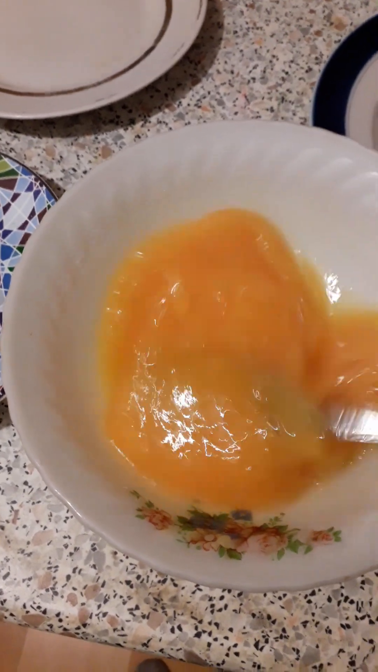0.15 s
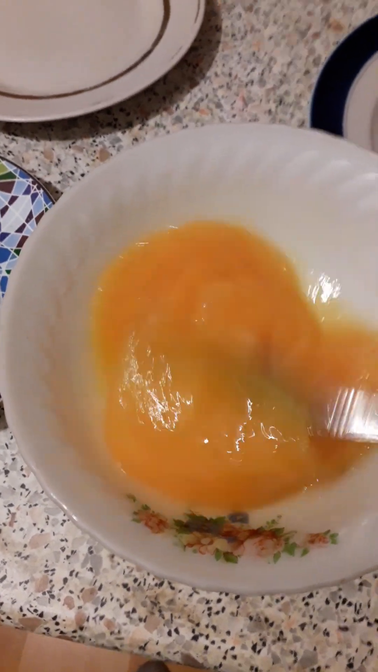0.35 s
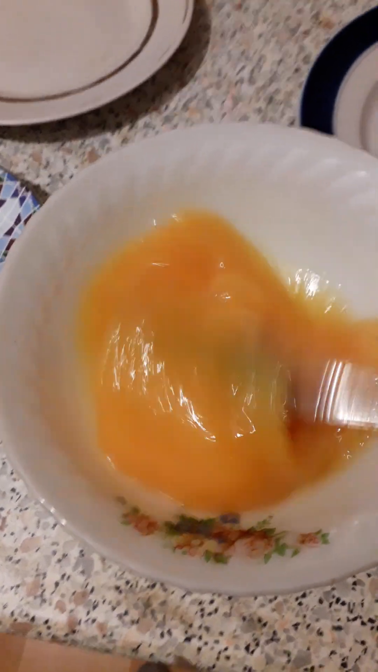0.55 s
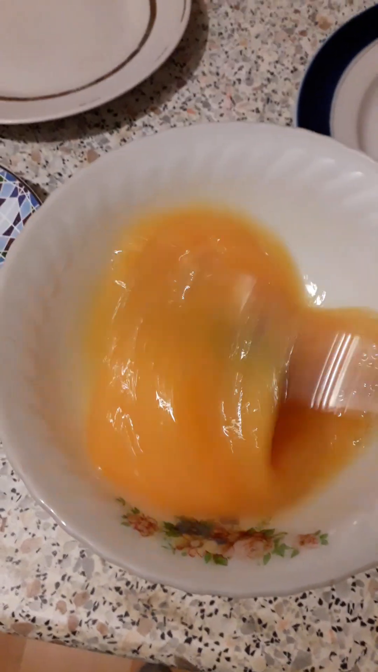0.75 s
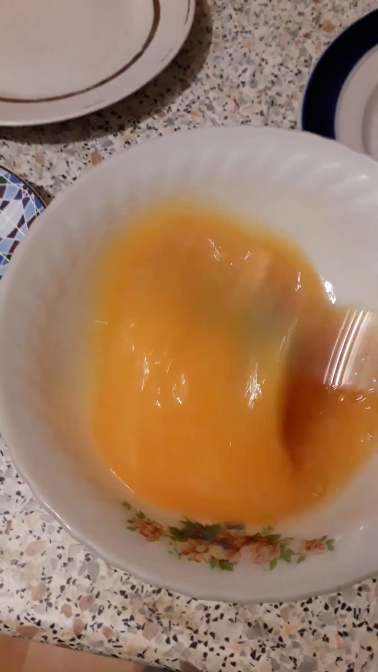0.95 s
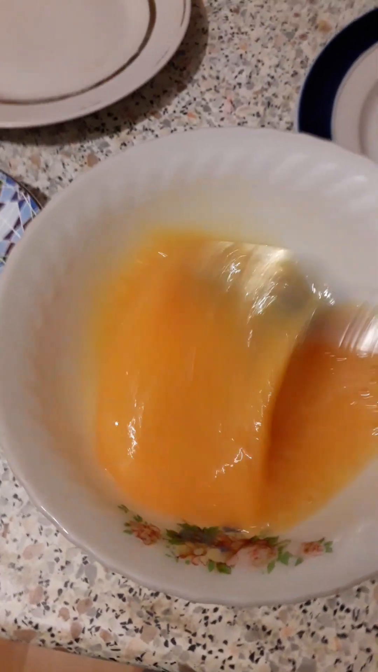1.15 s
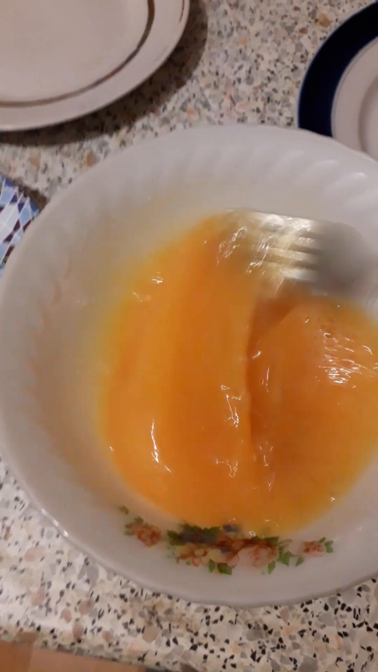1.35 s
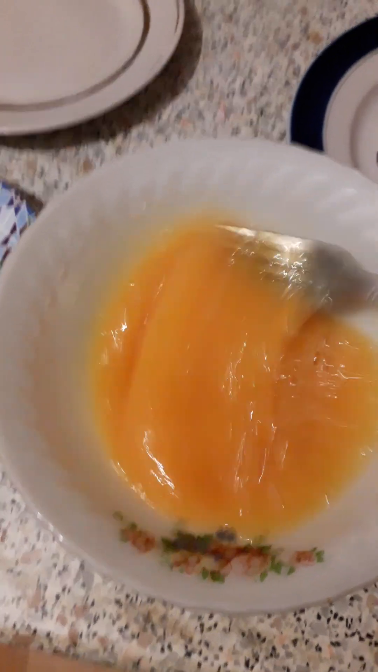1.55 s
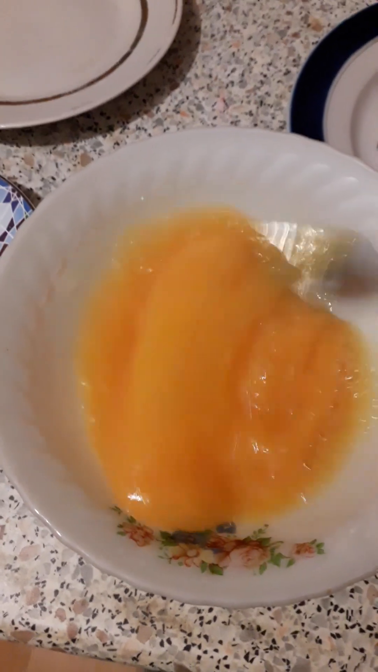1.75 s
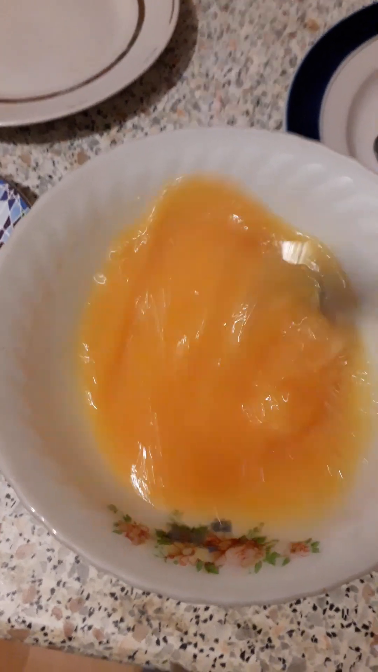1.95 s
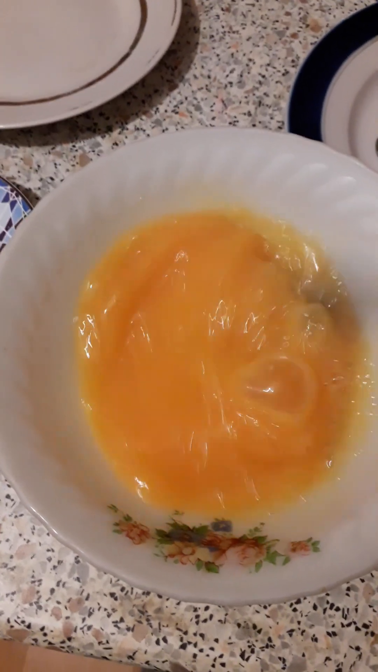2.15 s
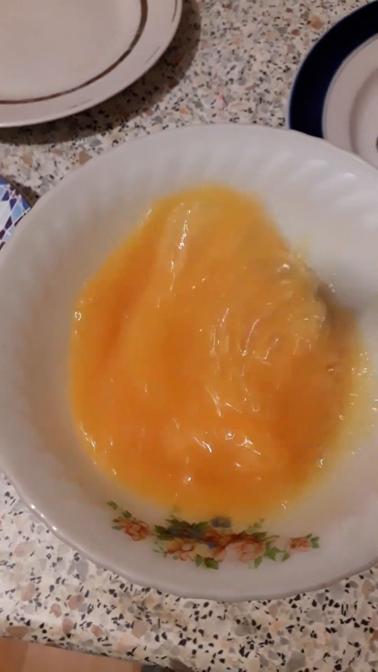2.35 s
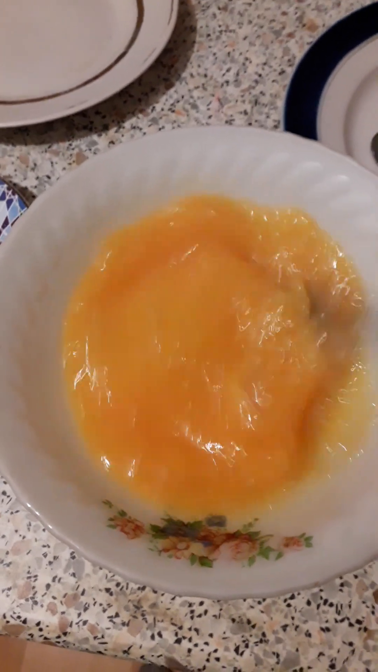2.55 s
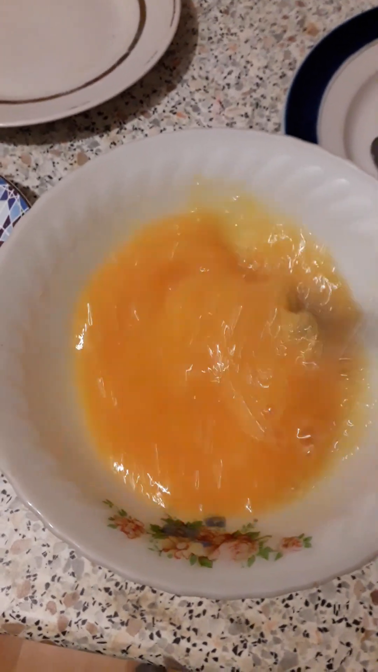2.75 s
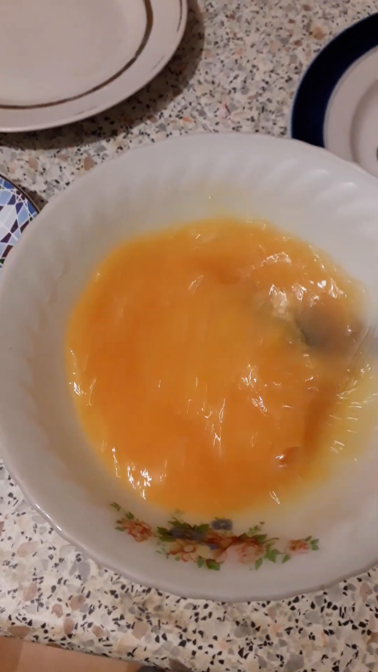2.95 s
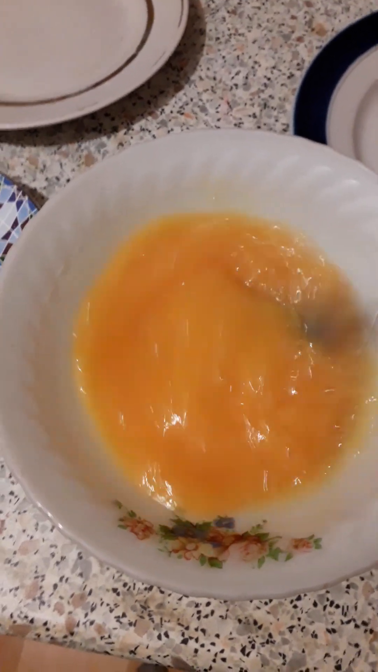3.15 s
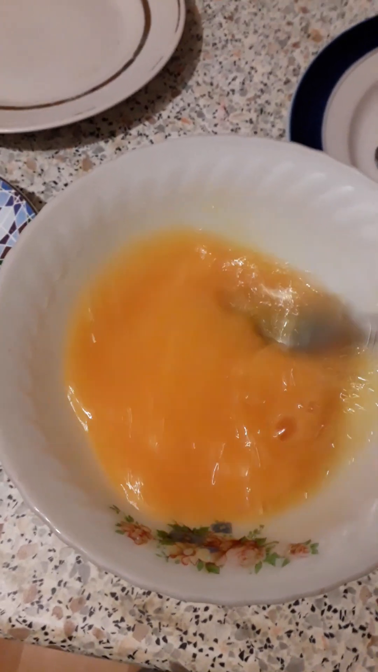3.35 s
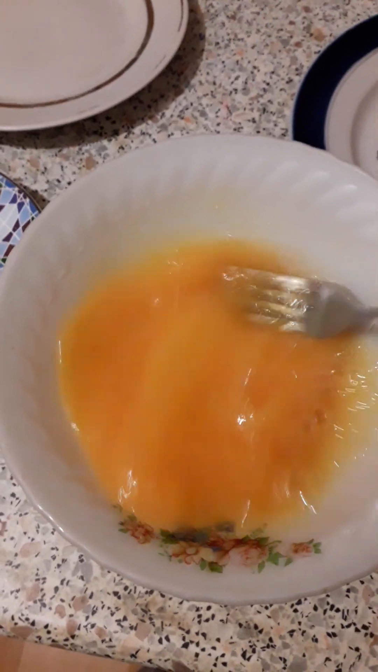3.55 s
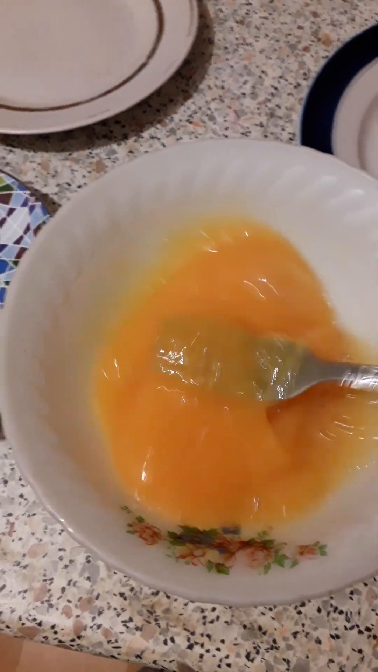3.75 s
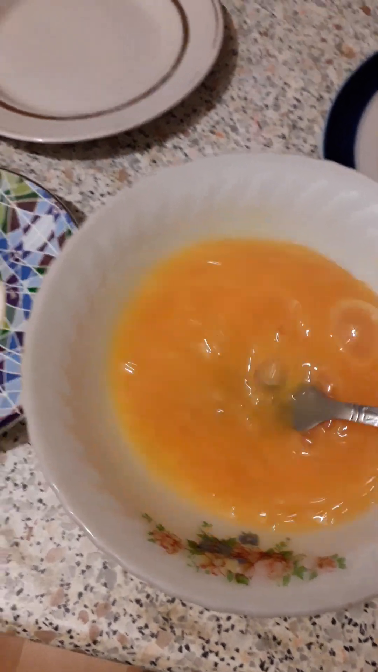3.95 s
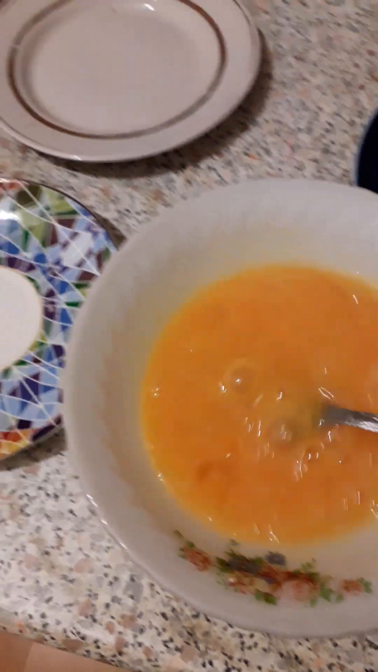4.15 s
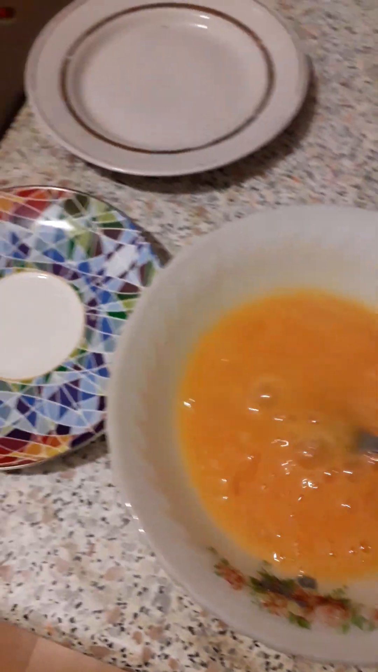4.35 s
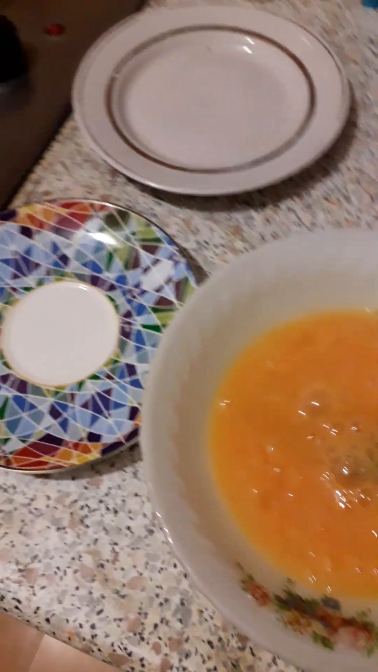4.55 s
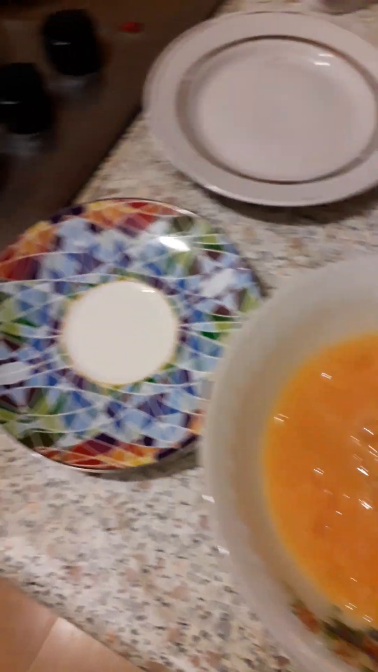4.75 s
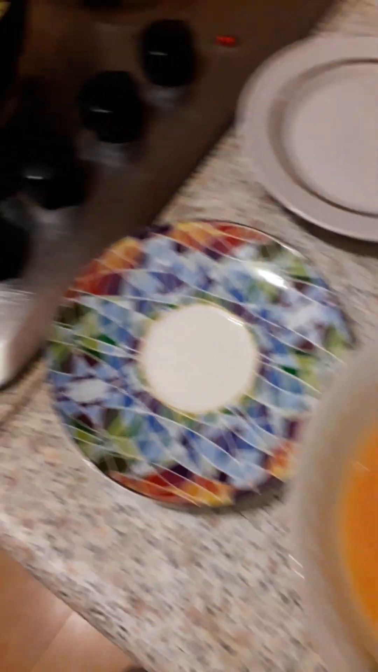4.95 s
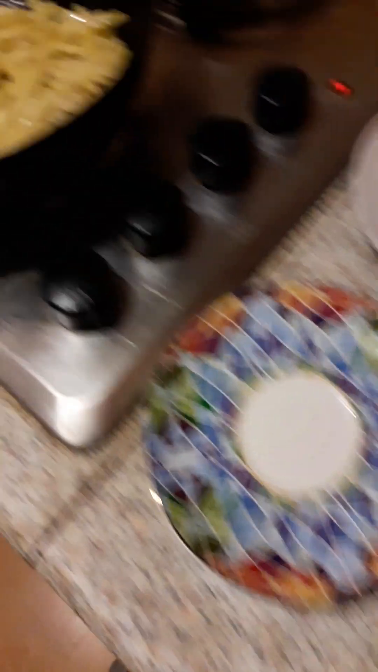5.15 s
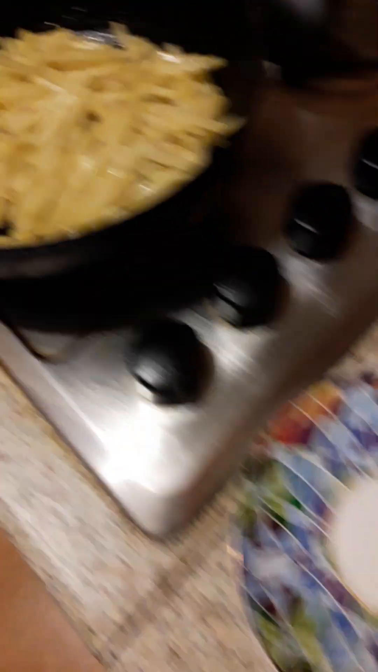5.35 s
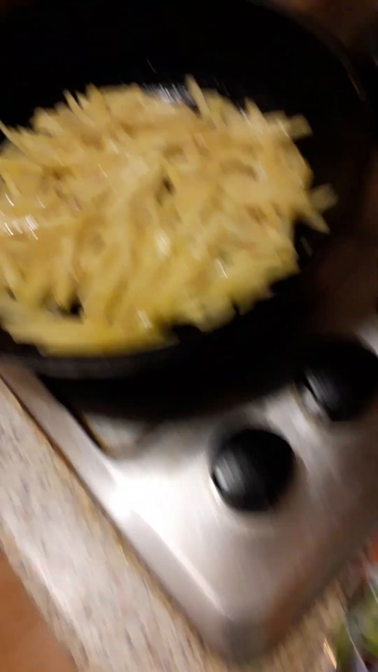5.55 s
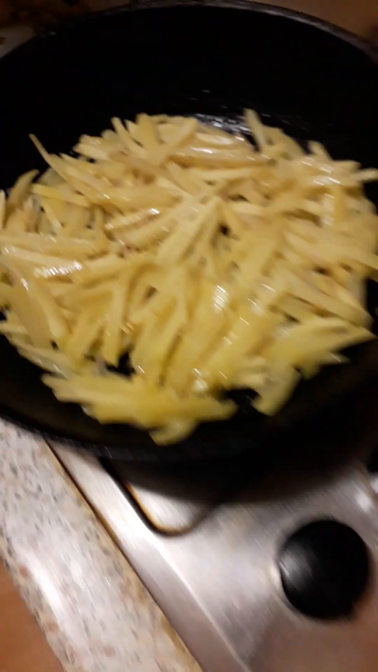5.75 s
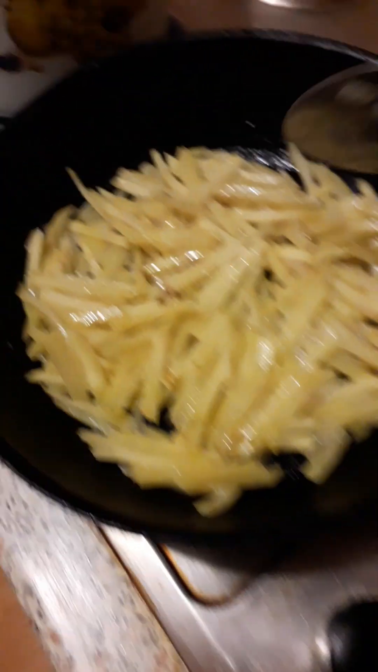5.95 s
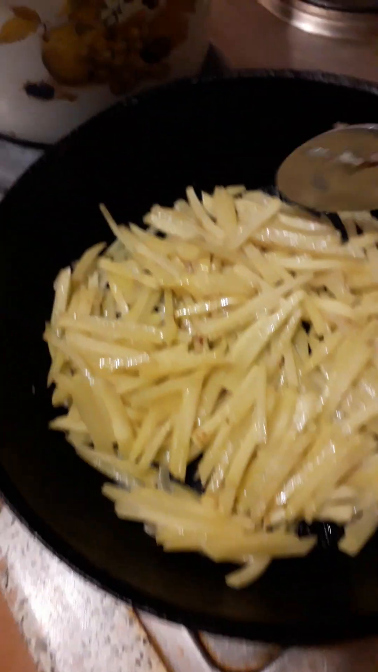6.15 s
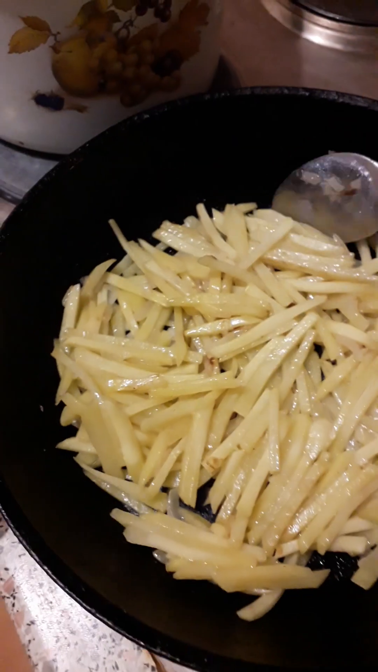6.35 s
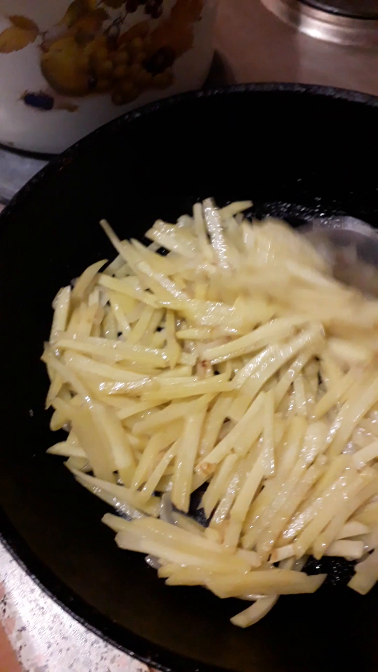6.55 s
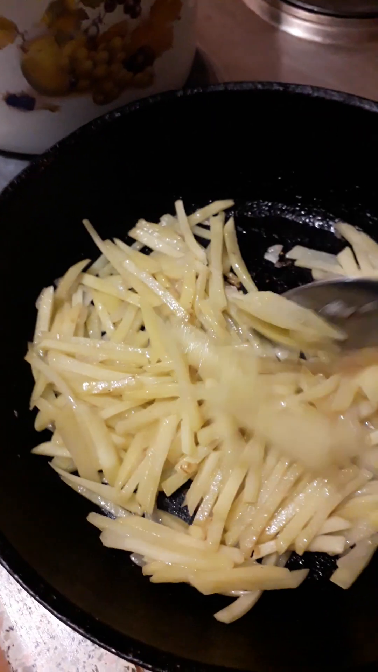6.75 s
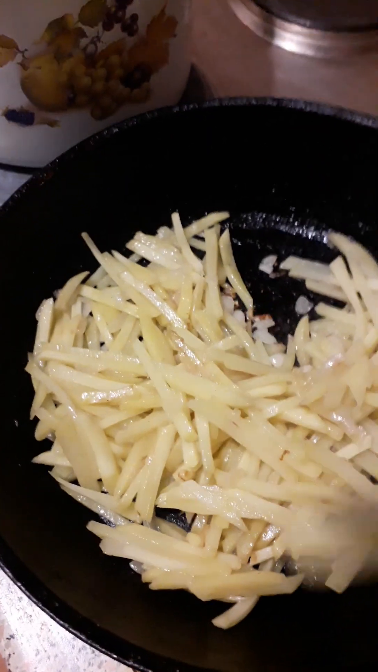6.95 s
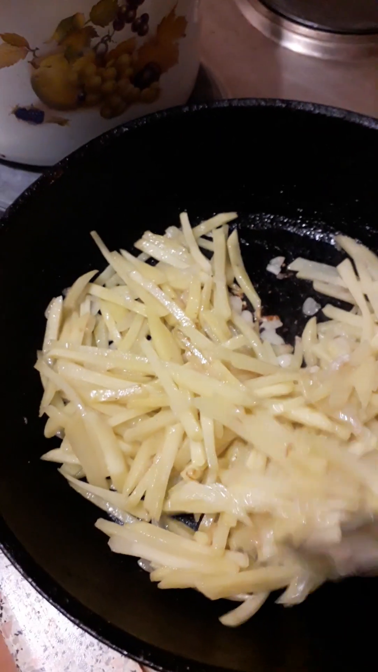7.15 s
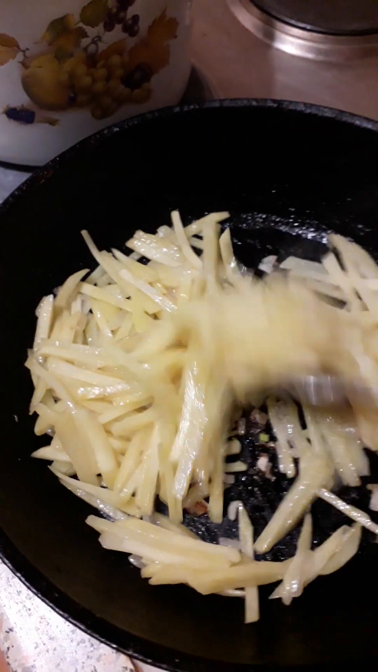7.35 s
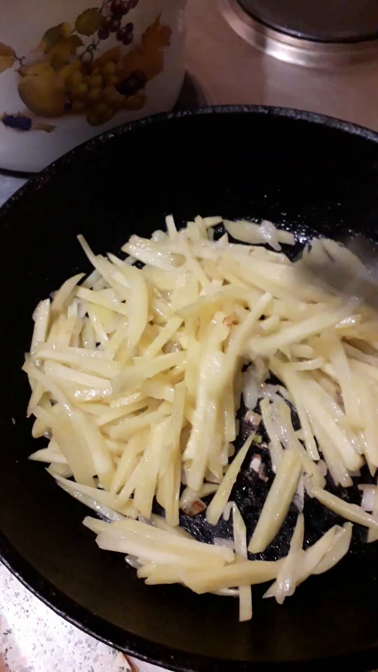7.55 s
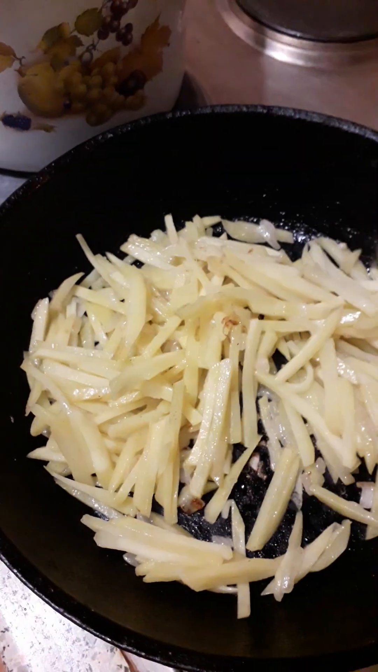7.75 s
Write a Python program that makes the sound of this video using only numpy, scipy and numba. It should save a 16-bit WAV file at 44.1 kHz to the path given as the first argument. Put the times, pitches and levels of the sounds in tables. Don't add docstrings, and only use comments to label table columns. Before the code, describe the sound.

Rapid scraping whisking of egg against glazed china over faint frying, a sharp rim clink, then swelling oil sizzle with spoon knocks on iron.

```python
import sys
import numpy as np
from scipy import signal
from scipy.fft import rfft, irfft, next_fast_len
from scipy.io import wavfile
from scipy.ndimage import uniform_filter1d
from numba import njit

SR = 44100
rng = np.random.default_rng(int(sys.argv[2]) if len(sys.argv) > 2 else 0)


def transcribe(u):
    v = np.clip(np.atleast_2d(u).T, -1, 1)
    q = np.round(v * 32767).astype(np.int16)
    wavfile.write(sys.argv[1], SR, q)


def magnitude_from_level(level_db):
    exponent = np.asarray(level_db, float) / 20
    return 10 ** exponent


N = 344421

# frequency in Hz, level in dB per Hz.
HUM_SPECTRUM = [(15, -52), (25, -21), (106, -4), (266, -18.5), (437, -8.5), (666, -13), (814, -7.5),
                (1010, -11.5), (2000, -60), (2600, -29), (4400, -120)]
# frequency in Hz, gain in dB.
MICROPHONE = [(40, -40), (85, -17), (120, -2), (200, -3), (255, -10), (310, 0), (15700, 0), (15900, -26),
              (17000, -32)]

# start in seconds, tap level in dB, slide in seconds, slide rms in dB.
FOOT_SHUFFLES = [
    (4.52, -70, 0.24, -62.5),
    (4.87, -80, 0.037, -49.5),
]
# frequency in Hz, level in dB, 60 dB decay in seconds.
BOARD_MODES = [(340, -8, .03), (432, -2, .035), (786, -4, .025), (1280, -3, .03), (1730, 2, .04)]
# start in seconds, length in seconds, rms in dB,
# pitch in Hz.
WHISTLES = [(0, 0.059, -44, 1380), (4.05, 0.11, -49, 1180), (4.87, 0.034, -43, 4000),
            (6.598, 0.049, -56, 1270), (6.697, 0.053, -55, 1030), (7.272, .12, -40, 2300),
            (7.633, 0.037, -36.5, 3300), (1.469, 0.026, -37, 1380), (1.97, 0.032, -24, 2600),
            (1.779, 0.011, -24, 8500), (6.48, 0.045, -40.5, 1790), (2.046, 0.02, -45, 1340),
            (2, 0.032, -38, 1200)]

# time in seconds, level in dB.
SIZZLE_LEVEL = [(0, -47.5), (2, -48.5), (3.8, -49), (4.3, -47), (5, -45.5), (5.5, -44.5), (6, -42),
                (6.4, -40), (6.52, -35), (6.62, -37), (6.72, -39), (7.12, -38.5), (7.25, -35.5), (7.4, -35),
                (7.5, -32.5), (7.81, -33.5)]
# frequency in Hz, level in dB per Hz.
SIZZLE_SPECTRUM = [(350, -15.5), (600, -12), (1080, -8.5), (1270, -4.5), (1620, -5.5), (2440, 0),
                   (3380, -5.5), (4430, 0), (5660, -4), (6400, -3.5), (11800, -9), (15500, -9.5)]
# start in seconds, peak in dB, pitch in Hz.
OIL_SPITS = [(4.2454, -25, 4330), (4.6616, -27, 6860), (4.9213, -28, 4170), (5.1, -27, 3820),
             (5.2385, -21.5, 5700), (5.757, -30, 4450), (5.8015, -21.5, 9900), (5.81, -25, 12500),
             (5.831, -30, 6000), (5.878, -19.5, 2500), (6.0455, -24, 11200), (7.417, -9, 4670),
             (7.4179, -15.5, 2100), (7.4927, -10.5, 6570), (7.6004, -11.5, 4760), (7.664, -21, 3100),
             (7.709, -21, 2400), (7.73, -19, 1824)]
# start in seconds, peak in dB, tap on the iron in dB.
WATER_BURSTS = [(5.3403, -25, -60), (5.498, -25, -65), (5.5503, -28, -56), (6.046, -20.5, -55),
                (6.114, -23, -47), (6.1689, -30, -53), (6.2517, -21.5, -56), (6.2973, -26, -55),
                (6.7533, -17, -39), (6.768, -15, -42), (6.7783, -14.5, -41), (6.8184, -23, -47),
                (6.867, -26, -38), (6.915, -18.5, -41), (6.943, -15.5, -33.5), (6.9992, -28, -41),
                (7.036, -30, -36), (7.1146, -20, -39), (7.1786, -25, -42), (7.201, -18, -33),
                (7.285, -15, -39), (7.3285, -24, -46), (7.415, -21, -33.5), (7.5294, -16, -44),
                (7.55, -19, -41), (7.6826, -13, -42), (7.773, -16, -38), (7.7944, -10, -40)]

# start in seconds, knock peak in dB, scrape in seconds, scrape rms in dB.
SPOON_KNOCKS = [
    (6.364, -11.5, 0.0035, -36),
    (6.448, -23, .004, -60),
    (6.476, -16.5, 0.006, -37),
    (7.763, -26, 0.005, -43),
    (7.773, -29, .02, -66),
]
# start in seconds, rise in seconds, hold in seconds, rms in dB.
SPOON_PUSHES = [
    (6.366, 0.0052, 0.012, -34),
    (6.422, 0.03, 0.081, -45),
    (7.094, 0.055, 0.043, -40),
    (7.19, 0.027, 0.054, -53),
    (7.756, 0.012, 0.011, -41),
]
# start in seconds, peak in dB, pitch in Hz.
PAN_BOOMS = [
    (6.366, -23, 114),
    (6.368, -28, 481),
    (6.37, -40, 366),
    (7.765, -26, 111),
]
# frequency in Hz, level in dB, 60 dB decay in seconds.
PAN_MODES = [(360, -17, .07), (484, -13, .07), (920, 0, .015), (1340, 0, .012), (1840, -1.5, .012),
             (2350, -3, .011)]

# start in seconds, tap peak in dB, slide in seconds, slide rms in dB.
RIM_TOUCHES = [
    (3.959, -5.5, 0.0057, -19),
    (3.9662, -15, 0.0049, -23),
    (3.986, -25, 0.037, -40),
    (4.04, -33, 0.048, -38),
    (4.091, -47, 0.034, -41.5),
    (4.122, -23, 0.012, -28.5),
    (4.136, -18.5, 0.0076, -31),
    (4.148, -20, 0.011, -34.5),
]
# frequency in Hz, level in dB, 60 dB decay in seconds.
RIM_MODES = [(743, -26, 0.078), (1134, -13, 0.068), (2400, -7.5, 0.036), (2715, -8.5, 0.12),
             (4120, 2, 0.061), (5794, 3.5, 0.032), (4960, -8, 0.015), (10800, -10, .02), (7730, -10, .05),
             (7840, -10.5, 0.057), (8670, -7, 0.029), (9820, -6, 0.061), (12240, -12, 0.033),
             (14770, -11, .06)]
# frequency in Hz, level in dB, 60 dB decay in seconds.
TABLE_MODES = [(150, -9, .04), (335, -1, .03), (480, -5, .02), (760, -7, .016), (1130, -7, .04),
               (1400, -10, .03)]

# start in seconds, peak in dB, pitch in Hz.
EGG_PLOPS = [(0.048, -29, 1090), (0.083, -27, 1097), (0.282, -34, 1330), (0.481, -26.5, 670),
             (0.565, -27, 990), (0.652, -20, 480), (0.734, -28.5, 735), (0.75, -21, 1100),
             (0.857, -25, 1160), (1.047, -22, 1000), (1.125, -18, 694), (1.216, -11.5, 1070),
             (1.405, -13.5, 1110), (1.587, -16, 1114), (1.937, -41, 735), (1.966, -14, 650),
             (2.151, -18.5, 1090), (2.225, -17.5, 1150), (2.348, -21.5, 665), (2.463, -32, 835),
             (2.52, -20.5, 425), (2.604, -17, 785), (2.76, -21, 1110), (2.946, -33, 681),
             (3.044, -31, 1100), (3.114, -30.5, 880), (3.562, -21.5, 1033), (3.669, -20.5, 1330),
             (3.8, -38, 650)]
# start in seconds, peak in dB, pitch in Hz.
CLEAR_RINGS = [
    (0.8748, -16, 2176),
    (1.7775, -6, 2700),
    (1.8415, -19, 2430),
    (2.359, -16, 2690),
    (3.2235, -20, 2640),
]
# start in seconds, tap level in dB, drag in seconds,
# drag rms in dB.
BOWL_SINGS = [(0.144, -28, 0.026, -27.5), (.301, -24, .004, -37), (0.334, -32, 0.021, -26),
              (0.498, -22, .004, -37), (.528, -21, 0.007, -26), (.719, -14.5, 0.0085, -37),
              (0.91, -23, 0.0077, -44), (1.061, -15, 0.0033, -23), (1.098, -19, 0.01, -24),
              (1.2302, -1.5, 0.0045, -30), (1.28, -32, 0.013, -31), (1.419, -23, 0.0067, -40),
              (1.611, -12.5, 0.004, -32), (1.65, -22.5, 0.0072, -26), (1.778, -18.5, 0.035, -27),
              (1.841, -26, 0.0071, -36), (2.031, -23, 0.018, -41), (2.181, -14.5, 0.0039, -19.5),
              (2.226, -20, 0.0041, -31.5), (2.36, -20, 0.027, -28), (2.422, -29, .01, -35),
              (2.576, -24, .004, -35), (2.617, -23, 0.02, -25), (2.759, -14, .003, -42),
              (2.773, -21, 0.0038, -27), (2.82, -33, 0.021, -23), (2.971, -15.5, 0.0033, -33),
              (3.021, -33, 0.018, -31.5), (3.186, -23, 0.005, -31), (3.225, -28, 0.018, -21.5),
              (3.43, -22, 0.042, -29), (3.642, -15.5, 0.027, -29.5)]
# frequency in Hz, level in dB, 60 dB decay in seconds
SONG_MODES = [(2203, -24, 0.09), (2267, 3.5, 0.016), (2320, -21, 0.021), (2610, 2.5, 0.02)]
# start in seconds, tap level in dB, slide in seconds, slide rms in dB.
WALL_SLIDES = [
    (0.157, -42, 0.013, -34),
    (.346, -45, 0.0075, -29),
    (1.775, -14, .02, -44),
    (2.358, -20, .01, -43),
    (2.83, -47, .015, -40),
    (3.035, -43, 0.014, -36),
    (3.24, -45, 0.031, -34),
    (3.457, -46, 0.015, -29),
    (3.654, -44, 0.026, -29),
]
# frequency in Hz, level in dB, 60 dB decay in seconds.
DRY_WALL_MODES = [(2740, -9, 0.076), (4090, -12, 0.15), (5750, 5.5, 0.048), (7800, -6, 0.12),
                  (11340, -8, 0.045)]

# start in seconds, tap peak in dB,
# tines over bowl in dB, chatter rms in dB.
DIPS = [(0.0844, -19, -23, -52), (0.28, -27, -7, -55), (0.479, -22, 6, -33), (0.663, -16.5, 8, -37),
        (0.859, -34, 22, -38), (1.0466, -11.5, -5, -38), (1.214, -20, 5, -31), (1.4, -35, -8, -37),
        (1.5862, -4.5, -12, -32.5), (1.7741, -15, 11, -30), (1.968, -4, -18, -36),
        (2.1443, -15.5, -21, -43), (2.352, -18, 3.5, -40), (2.5362, -22.5, 7, -30), (2.7574, -10, -31, -43),
        (2.948, -18, -14, -47), (3.345, -13.5, -5.5, -32.5), (3.562, -37, 17, -32)]
# start in seconds, tap peak in dB, glaze over bowl in dB,
# drag rms in dB.
LANDINGS = [(0.108, -15, 4, -35), (0.3009, -11, -6, -34), (0.4968, -10, -1, -34.5),
            (0.6848, -8.5, -4, -36.5), (0.8744, -10, -2, -29), (1.0611, -5.5, -2, -31.5),
            (1.2301, 1, -5, -31.5), (1.4065, -0.5, -5, -27.5), (1.4196, -5, -1, -30),
            (1.6106, -7, -1, -30.5), (1.7774, -2, 0, -38), (1.796, -4.5, -9, -27.5), (1.985, -11, 6, -32.5),
            (2.1827, -9.5, 1.5, -37), (2.3589, -7, 2.5, -34), (2.3746, -6, -2, -33),
            (2.5761, -13.5, 2, -32), (2.773, -15.5, 4.5, -34.5), (2.9714, -13.5, 3, -35.5),
            (3.1845, -16.5, -0.5, -36), (3.3875, -12.5, -3, -35.5), (3.5956, -11.5, 0, -34.5)]
# start in seconds, tap peak in dB, glaze over bowl in dB,
# scrape in seconds, scrape rms in dB.
LIFTS = [(0.142, -17.5, 0, 0.017, -27.5), (0.3327, -19, 9.5, 0.02, -27), (0.528, -9.5, -13, 0.0098, -27.5),
         (0.719, -7.5, -6, 0.027, -33), (0.9087, -6.5, -4, 0.02, -27), (1.0975, -5, -12, 0.01, -23),
         (1.281, -13, 4, 0.0064, -27.5), (1.4658, -33, 9, 0.023, -29), (1.6509, -11.5, -1, 0.012, -29.5),
         (1.8409, -9.5, -7, 0.0099, -29), (2.031, -16, -1, 0.015, -33), (2.225, -7.5, -13, 0.0084, -27.5),
         (2.4221, -8.5, -21, 0.014, -30), (2.618, -21, -40, 0.015, -27.5), (2.8183, -23, -9, 0.023, -27),
         (3.0206, -17, -3, 0.022, -29.5), (3.2227, -26, 2, 0.031, -27.5), (3.4305, -13, 0, 0.037, -27),
         (3.642, -11.5, -3, 0.031, -26.5)]
# start in seconds, tap peak in dB, glaze over bowl in dB.
TICKS = [(0.291, -41, 28), (0.4735, -21, -27), (0.4892, -30, -20), (0.519, -18, -21), (0.6657, -6.5, -14),
         (0.6685, -16, -12), (0.672, -14.5, -1), (0.737, -21, 5), (1.288, -22, 0), (1.7805, -6.5, -3),
         (0.8649, -5, -22), (1.039, -18, -16), (1.0557, -6.5, -17), (1.218, -13, -19), (1.324, -24.5, 2),
         (2.0469, -19, 0), (2.149, -25, -14), (2.159, -20, -1), (2.164, -21, -1), (2.4, -34, 18),
         (2.5558, -18.5, -8), (2.6355, -22, 0), (2.793, -24, -7), (3.564, -24.5, 10), (0.239, -28, -7),
         (0.284, -31, 4), (1.359, -24, -9), (1.938, -45, -23), (1.944, -27, -23), (1.958, -21, -22),
         (2.524, -26, -10), (2.7167, -29, -12), (2.93, -27, -17), (3.1155, -25, -26), (3.373, -30, -10),
         (3.5711, -22, 12)]
# frequency in Hz, level in dB, 60 dB decay in seconds.
WET_BOWL_MODES = [(1800, -9, .016), (2170, 0, .018), (2380, -1, .016), (2600, 0, .02), (2950, -7, .01)]
# frequency in Hz, level in dB, 60 dB decay in seconds.
TINE_MODES = [(3320, -8, .01), (4470, -1.5, .01), (4910, -4.5, .016), (6207, 4, .01), (6940, -3, .016),
              (7420, 2.5, .013), (8160, 0, .009)]
# frequency in Hz, level in dB, 60 dB decay in seconds.
GLAZE_MODES = [(11340, 0, .012), (12250, 4, .009), (13000, -4, .01), (13750, 1, .009), (14700, -2, .012)]
# frequency in Hz, level in dB, 60 dB decay in seconds.
BOWL_WALL_MODES = [(1130, -8, .08), (2670, 0, .11)]


def level(x, db):
    return x * magnitude_from_level(db) / np.sqrt(np.mean(x ** 2))


def colour(x, points):
    size = next_fast_len(len(x))
    hz, db = np.transpose(points)
    bin_hz = np.arange(size // 2 + 1) * SR / size
    gain = magnitude_from_level(np.interp(np.log(bin_hz + 1), np.log(hz), db))
    return irfft(rfft(x, size) * gain, size)[:len(x)]


def walk(rate, size=N):
    hold = int(SR / rate)
    steps = np.repeat(rng.standard_normal(size // hold + 1), hold)
    return 1.3 * uniform_filter1d(uniform_filter1d(steps, hold), hold)[:size]


@njit
def grains(rows, glide, rise, out):
    for s, size, hz, cycles in rows:
        start = int(s * SR)
        span = int(cycles / hz * SR) + 2
        phase = 0.
        for i in range(min(span, len(out) - start)):
            phase += 2 * np.pi * hz / SR * (1 + glide * i / span)
            swell = min(phase / (2 * np.pi * rise), 1.)
            fade = np.exp(-np.log(1000) * i / span)
            out[start + i] += size * swell * fade * np.sin(phase)
    return out


def pings(table, fade_s, glide, rise):
    s, db, hz = np.transpose(table)
    return grains(np.stack([s, magnitude_from_level(db), hz, fade_s * hz], axis=1), glide, rise, np.zeros(N))


def touches(s, tap_db, drag_s, drag_db, tap_s, let_go_s):
    taps, drags = np.zeros(N), np.zeros(N)
    jolt = np.exp(-np.arange(256) / (tap_s * SR))
    jolt /= np.sqrt(np.sum(jolt ** 2))
    for start, tap, span, drag in zip((s * SR).astype(int), magnitude_from_level(tap_db), np.abs(drag_s), magnitude_from_level(drag_db)):
        taps[start:start + len(jolt)] += tap * jolt
        t = np.arange(min(int((span + 6 * let_go_s) * SR), N - start)) / SR
        drags[start:start + len(t)] += drag * np.exp(-np.maximum(t - span, 0) / let_go_s)
    return taps, drags


@njit
def mode(push, hz, t60):
    out, z = np.empty(len(push)), 0j
    fade = np.exp(-np.log(1000) / (t60 * SR))
    for i in range(len(push)):
        z = z * fade * np.exp(2j * np.pi * hz[i] / SR) + push[i] + 1e-18
        out[i] = z.imag
    return out


def ring(modes, taps, drags, grit_db, tap_db, wander, drift=0.027):
    hz, db, t60 = np.transpose(modes)
    gains = magnitude_from_level(db) / np.sqrt(np.sum(magnitude_from_level(db) ** 2))
    sustain = np.sqrt(np.sum(gains ** 2 * t60 * SR / np.log(1000)) / 4)
    live = np.flatnonzero(taps + drags > 0)
    part = slice(live[0], min(live[-1] + SR // 2, N))
    size = part.stop - part.start
    grit = magnitude_from_level(grit_db * np.repeat(rng.standard_normal(size // 32 + 1), 32)[:size])
    rub = drags[part] * level(grit, 0) * rng.standard_normal(size) / sustain
    out = np.zeros(N)
    for f, fade, gain in zip(hz, t60, gains):
        jolt = taps[part] * (1 - wander + wander * rng.standard_normal(size))
        push = magnitude_from_level(tap_db) * jolt + rub * magnitude_from_level(7.04 * wander * walk(39.77, size))
        pitch = f * (1 + drift * wander * walk(25.13, size))
        out[part] += gain * mode(push, pitch, fade)
    return out


def hum():
    return level(colour(rng.standard_normal(N), HUM_SPECTRUM), -63.5) * magnitude_from_level(walk(1.85))


def foot():
    taps, drags = touches(*np.transpose(FOOT_SHUFFLES), tap_s=.001, let_go_s=0.017)
    return ring(BOARD_MODES, taps, drags, grit_db=2.5, tap_db=-7, wander=0.25)


def whistles():
    out = np.zeros(N)
    for s, span, db, hz in WHISTLES:
        taps, drags = touches(*np.transpose([(s, db, span, db)]), tap_s=.001, let_go_s=.01)
        out += ring([(hz, 0, .025)], taps, drags, grit_db=1.5, tap_db=-20, wander=.2)
    return out


def crackle(rate=1500, spread_db=5):
    chance = rng.random((int(rate * N / SR), 4))
    start = chance[:, 0] * N / SR
    size = magnitude_from_level(-spread_db * np.log(chance[:, 1] + .11))
    hz = 1200 * 12 ** chance[:, 2]
    cycles = 1.5 + 4 * chance[:, 3]
    rows = np.stack([start, size, hz, cycles], axis=1)
    return colour(grains(rows, 0.14, 0.69, np.zeros(N)), [(1000, -5.5), (16000, 15.5)])


def sizzle():
    t = np.arange(N) / SR
    near_db = np.interp(t, *np.transpose(SIZZLE_LEVEL))
    over_db = near_db + 40
    top_db = -1.5 + 0.23 * over_db
    worktop_db = 10.5 * np.clip(1 - (t - 3.85) / .45, 0, 1)
    bottom_db = -10.5 + 0.84 * over_db + worktop_db
    popping = level(crackle(), -4.0) * magnitude_from_level(0.36 * (near_db + 38.0))
    whole = colour(rng.standard_normal(N) + popping, SIZZLE_SPECTRUM)
    middle = colour(whole, [(1500, -30), (3800, 0), (7500, 0), (12000, -30)])
    top = colour(whole - middle, [(4000, -60), (6000, 0)])
    bottom = whole - middle - top
    mix = level(middle, 0.13) * magnitude_from_level(0.93 * walk(18))
    mix += level(top, 0.44) * magnitude_from_level(top_db + 0.74 * walk(9.8))
    mix += level(bottom, 0.13) * magnitude_from_level(bottom_db + walk(17))
    return magnitude_from_level(near_db + 0.91 * walk(25)) * mix


def spits():
    s, db, _ = np.transpose(OIL_SPITS)
    taps, spray = touches(s, db, 0 * s + .001, db - 15, tap_s=.0002, let_go_s=.003)
    noise = (0.16 * taps + spray) * rng.standard_normal(N)
    crack = colour(noise, [(1500, -11), (3000, 7.0), (6000, 7.0), (16000, 3)])
    return pings(OIL_SPITS, 0.0076, 0.024, 0.53) + crack


def bursts():
    s, db, iron_db = np.transpose(WATER_BURSTS)
    taps, spray = touches(s, db - 4, 0 * s + .0005, db - 22, tap_s=.0001, let_go_s=.0025)
    noise = taps + spray * rng.standard_normal(N)
    click = colour(noise, [(1000, -20), (2500, 13.5), (5000, 17.0), (16000, 3)])
    iron = touches(s, iron_db + 11, 0 * s, iron_db - 8, tap_s=.0001, let_go_s=0.0016)
    iron_ring = ring(PAN_MODES[2:], *iron, grit_db=1.5, tap_db=0, wander=.4)
    return click + colour(iron_ring, [(400, -26), (1200, -4)])


def knocks():
    taps, drags = touches(*np.transpose(SPOON_KNOCKS), tap_s=.0001, let_go_s=.005)
    iron = ring(PAN_MODES, taps, drags, grit_db=3, tap_db=-5, wander=.25)
    return colour(iron, [(200, -20), (700, 0.5)]) + pings(PAN_BOOMS, 0.096, 0., 2.3)


def pushed_food():
    t = np.arange(N) / SR
    stir = np.zeros(N)
    for s, rise, hold, db in SPOON_PUSHES:
        curve_db = np.interp(t - s, [0, rise, rise + hold, rise + hold + 1], [db - 13, db, db, db - 161])
        stir += (t > s) * magnitude_from_level(curve_db)
    # frequency in Hz, level in dB, 60 dB decay in seconds
    food = [(110, -11, .07), (230, -19, .03), (350, -5, .025), (480, 0, .03), (840, -6, .02)]
    squeezed_air = pings([(7.11, -30, 306)], 0.236, 1.18, 16.6)
    return squeezed_air + ring(food, 0 * stir, stir, grit_db=2, tap_db=0, wander=0.3)


def rim():
    taps, drags = touches(*np.transpose(RIM_TOUCHES), tap_s=.00003, let_go_s=0.0066)
    thud = ring(TABLE_MODES[1:], taps, drags * magnitude_from_level(-15.5), grit_db=3.0, tap_db=-50, wander=0.24)
    rings = ring(RIM_MODES, taps, drags, grit_db=3, tap_db=-4.5, wander=0.2, drift=0.)
    resting = np.arange(N) > RIM_TOUCHES[3][0] * SR
    soft = colour(rings, [(2700, 2), (6000, -2), (8000, 0), (12000, -7)])
    return np.where(resting, soft, rings) + thud


def plops():
    return magnitude_from_level(-3.5) * pings(EGG_PLOPS, 0.046, 0.17, 0.39)


def gurgle(count=14, lead_s=0.00396, lasts_s=.12, bubble_db=-35):
    chance = rng.random((len(DIPS), count, 4))
    start = np.transpose(DIPS)[0][:, None] - lead_s + lasts_s * chance[..., 0]
    size = magnitude_from_level(bubble_db - 4.5 * np.log(chance[..., 1] + 0.12))
    hz = 380 * 3.9 ** chance[..., 2]
    cycles = 3 + 6 * chance[..., 3]
    rows = np.stack([start, size, hz, cycles], axis=-1)
    return grains(rows.reshape(-1, 4), 0.21, 1.0, np.zeros(N))


def froth(s, drag_s, tap_db):
    chance = rng.random((len(s), 3)).T
    start = s + 2.0 * drag_s * chance[0]
    peak_db = tap_db - 23 - 9 * chance[1]
    hz = 450 * 3.2 ** chance[2]
    return pings(np.stack([start, peak_db, hz], axis=-1), .016, .35, 1.)


def clear_rings():
    return pings(CLEAR_RINGS, 0.048, 0., .3)


def song(tap_fade_s=0.0028, let_go_s=0.0021, waver=0.027):
    s, tap_db, drag_s, drag_db = np.transpose(BOWL_SINGS)
    force = touches(s, tap_db, 0 * s, tap_db - 6.5, .001, tap_fade_s)[1]
    force += touches(s, tap_db, drag_s, drag_db - 6, .001, let_go_s)[1]
    wet = np.zeros(N)
    for hz, db, _ in SONG_MODES:
        strength = magnitude_from_level(db + 3.2 * walk(140))
        wet += strength * np.sin(np.cumsum(2 * np.pi * hz / SR * (1 + waver * walk(120))))
    slides = touches(*np.transpose(WALL_SLIDES), tap_s=.0001, let_go_s=0.0049)
    dry_wall = ring(DRY_WALL_MODES, *slides, grit_db=2, tap_db=0, wander=.25, drift=.004)
    return uniform_filter1d(force, size=24) * wet + dry_wall


def contacts():
    def tines(glaze_db):
        return -2 + 0.39 * glaze_db

    ends = np.sort([row[0] for row in LANDINGS + LIFTS])
    rows = [(s, tap, over, -64, 0.01, rub) for s, tap, over, rub in DIPS]
    for s, tap, over, rub in LANDINGS:
        rows.append((s, tap, tines(over), over, ends[ends > s][0] - s, rub))
    for s, tap, over, span, rub in LIFTS:
        rows.append((s, tap, tines(over), over, span, rub))
        rows.append((s + span, rub - 17.5, tines(over), over, 0.026, rub - 17.5))
    for s, tap, over in TICKS:
        rows.append((s, tap, tines(over), over, 0.0085, tap - 26))
    return np.transpose(rows)


def struck_part(modes, taps, drags, snap_db):
    low_hz, high_hz = modes[0][0], modes[-1][0]
    band = [(low_hz * .7, -30), (low_hz, 0), (high_hz, 0), (high_hz * 1.3, -30)]
    noise = (magnitude_from_level(snap_db) * taps + magnitude_from_level(2) * drags) * rng.standard_normal(N)
    edge = magnitude_from_level(11.5) * np.diff(taps, prepend=0).clip(0)
    body = ring(modes, taps, drags, grit_db=3, tap_db=-2.0, wander=0.75)
    return colour(body, [(low_hz / 2, -9), (low_hz, 0)]) + colour(noise + edge, band)


def fork():
    s, tap_db, tines_db, glaze_db, drag_s, drag_db = contacts()
    stutter = level(magnitude_from_level(2.2 * walk(350)), 0)
    brightest_db = np.maximum(0, np.maximum(tines_db, glaze_db))
    out = froth(s, drag_s, tap_db)
    # modes, tap over bowl in dB, drag trim in dB, snap in dB
    parts = ((WET_BOWL_MODES, 0 * s - 3, -6, 4),
             (TINE_MODES, tines_db, -10.5, 6),
             (GLAZE_MODES, glaze_db, -5.5, 12))
    for modes, over_db, drag_over_db, snap_db in parts:
        lean_db = 0.071 * (over_db - brightest_db)
        taps, drags = touches(s, tap_db + over_db, drag_s, drag_db + lean_db + drag_over_db,
                              tap_s=.00045, let_go_s=.004)
        out = out + struck_part(modes, taps, drags * stutter, snap_db)
    wall = touches(s, tap_db - 24, drag_s, drag_db - 20, tap_s=.0004, let_go_s=.004)
    out = out + ring(BOWL_WALL_MODES, *wall, grit_db=4, tap_db=0, wander=.9, drift=.003)
    thud = touches(s + 0.003794, tap_db - 19.5, drag_s, drag_db - 38.5, tap_s=0.0083, let_go_s=0.052)
    return out + ring(TABLE_MODES, *thud, grit_db=1.0, tap_db=0.0, wander=0.94)


def room(dry, t60_s=0.29, wet_db=-21):
    t = np.arange(int(.6 * SR)) / SR
    tail = colour(rng.standard_normal(len(t)), [(300, 11.0), (2500, -5), (12000, -15)])
    tail = tail * np.exp(-np.log(1000) * t / t60_s) * (t > .004)
    return dry + signal.fftconvolve(dry, level(tail, wet_db) / np.sqrt(len(tail)))[:N]


def scene():
    pan = spits() + bursts() + knocks() + pushed_food()
    egg = plops() + gurgle()
    bowl = rim() + clear_rings() + song() + fork()
    near = foot() + whistles() + pan + egg + bowl
    return (colour(room(near) + sizzle(), MICROPHONE) + hum())[None]


def top_cut(x):
    return signal.sosfilt(signal.butter(12, 16980, fs=SR, output="sos"), x)


def record(dry):
    rounded = np.tanh(0.66 * dry) / 0.74
    return top_cut(rounded)


dry = scene()
out = record(dry)
transcribe(out)
```